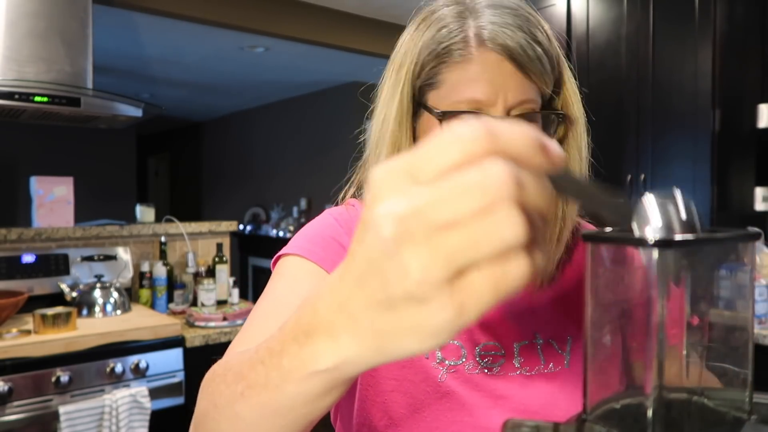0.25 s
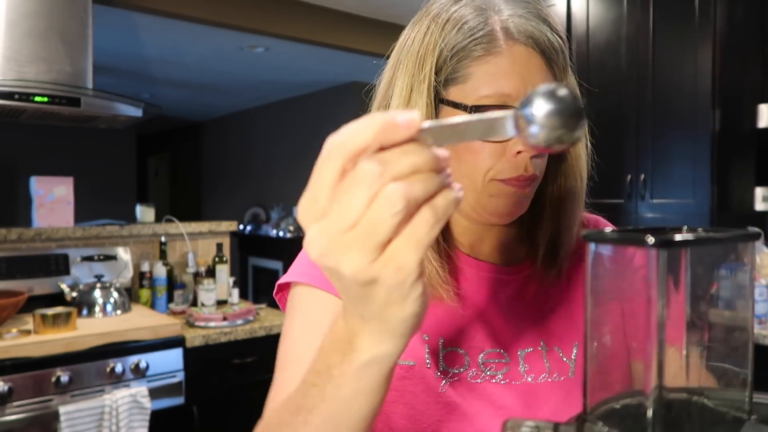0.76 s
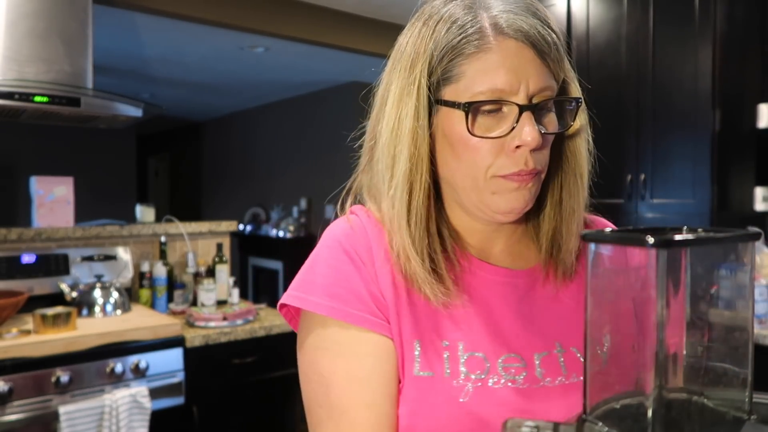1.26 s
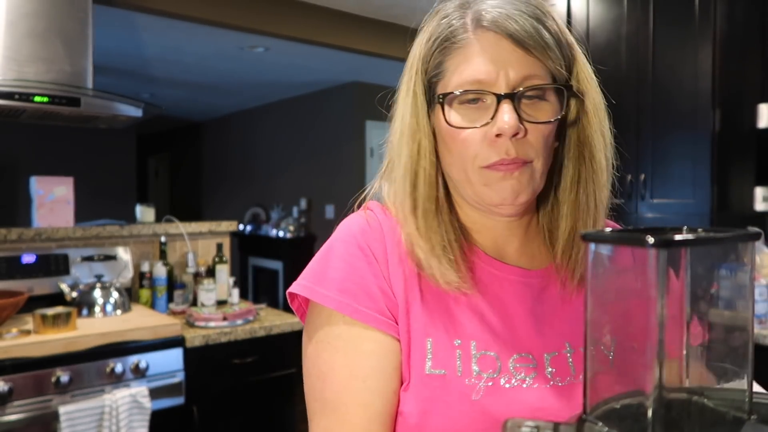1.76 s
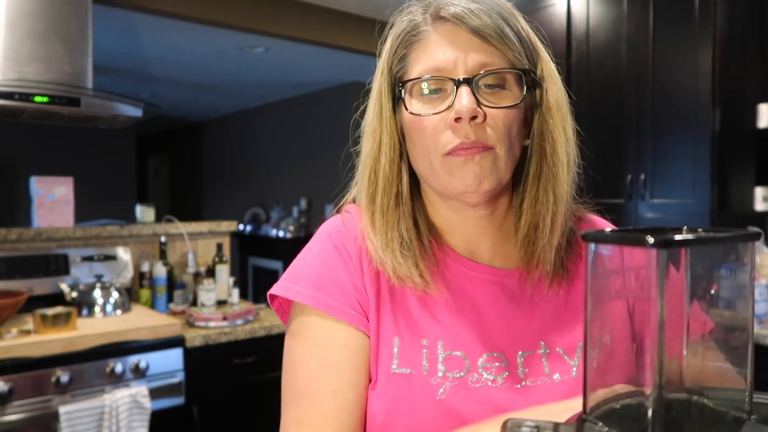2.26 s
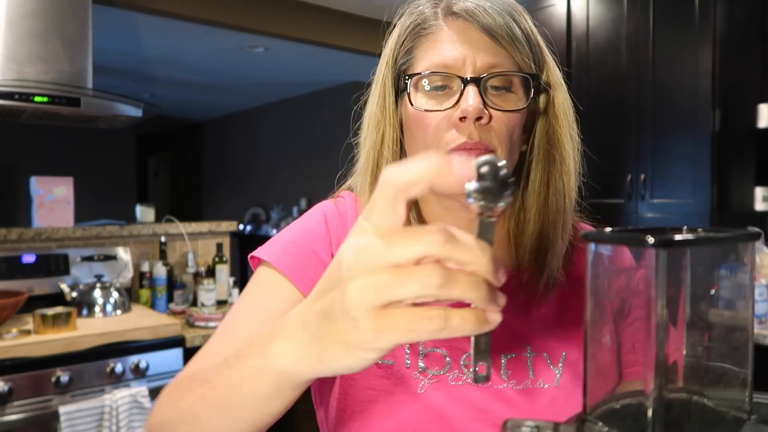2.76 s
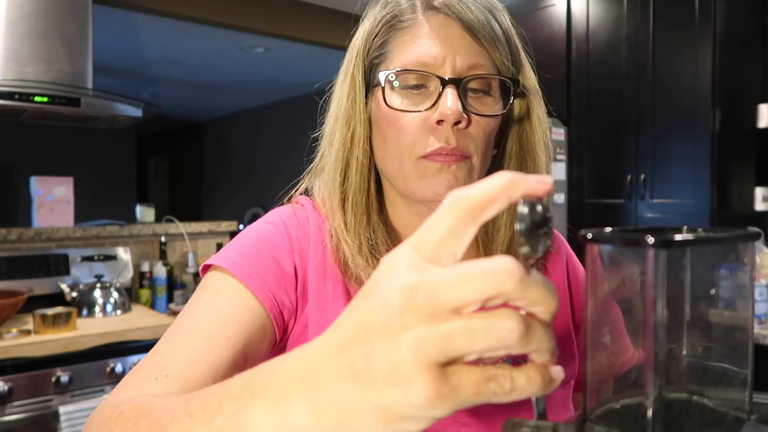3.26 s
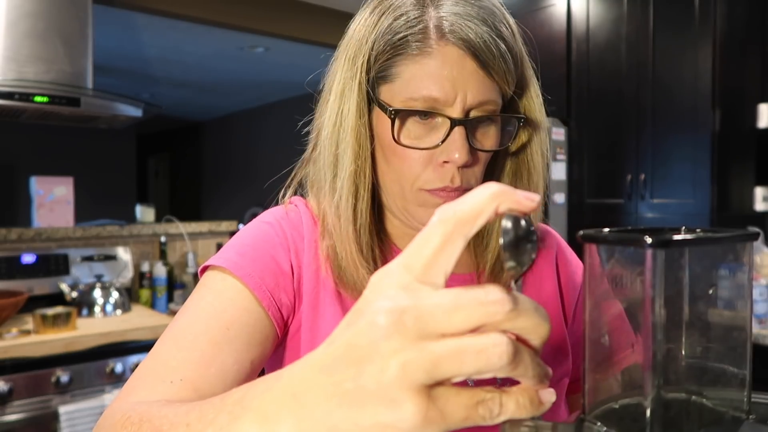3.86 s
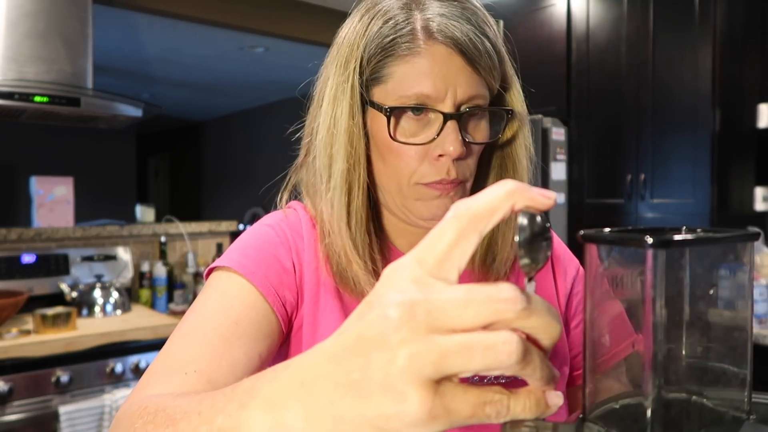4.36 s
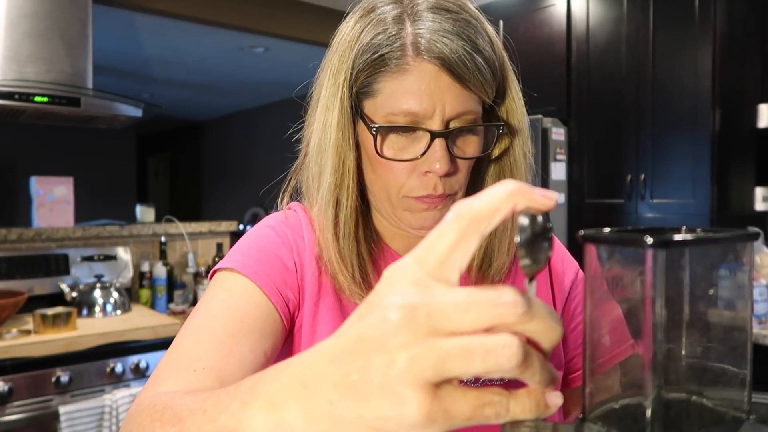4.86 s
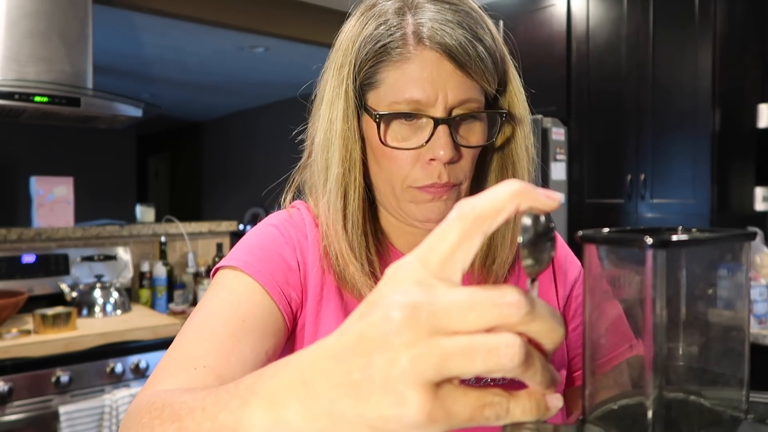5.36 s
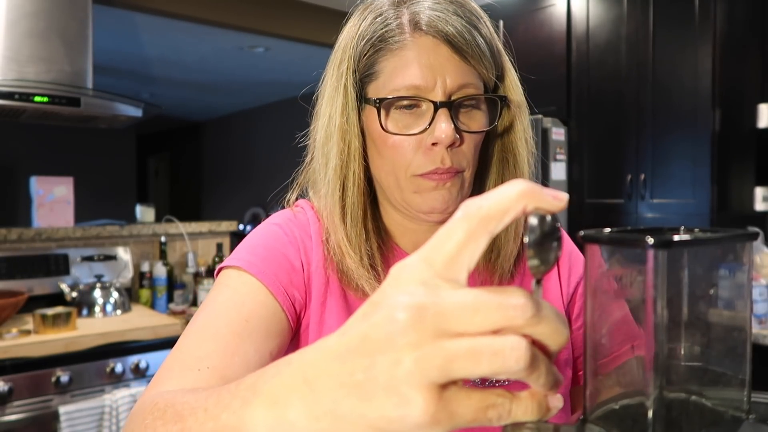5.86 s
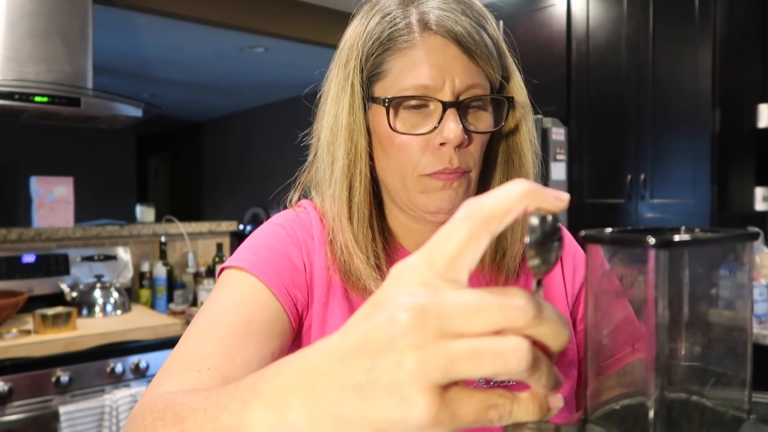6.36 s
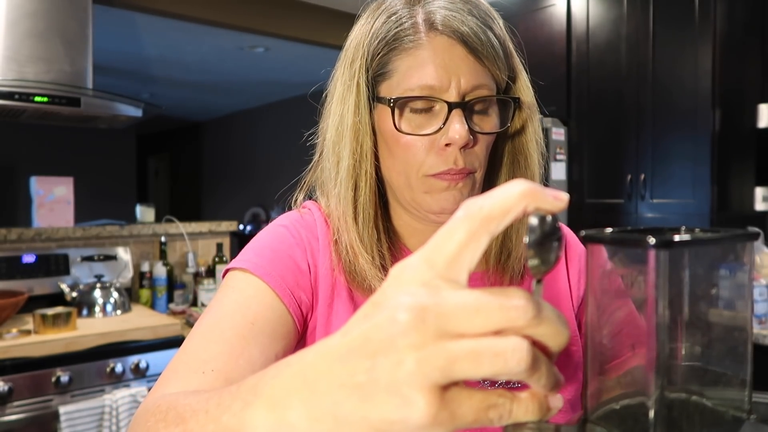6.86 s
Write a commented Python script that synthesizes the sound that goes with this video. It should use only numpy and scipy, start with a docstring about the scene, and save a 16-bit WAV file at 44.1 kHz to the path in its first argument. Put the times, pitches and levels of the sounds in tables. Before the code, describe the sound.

Four hard, ringing spoon taps on a plastic blender jar, very close to a stereo microphone in a lively kitchen. A steady low rumble rises, rustling strokes follow, then a set-down clunk with small rattles. The background suddenly thins. After a pause, several plastic switch clicks lead to a faint fluttering whistle and hiss; the motor catches with a rasp and whirs, easing and surging slightly.

```python
"""In a kitchen, a steel measuring spoon taps a plastic blender jar's rim four times: noise bursts and ringing modes.
Under it lies a steady rumble of shaped noise, heard at a level that dips, climbs, holds and then steps down;
strokes of rustling noise and a set-down clunk come before the step.
A switch clacks and the motor creeps with hissing noise and a thin, fluttering whistle.
It spins up to a whir of shaped noise and shaft tones, and hunts around its speed as power comes in bursts."""
import sys
import numpy as np
from scipy import signal
from scipy.fft import rfft, irfft
from scipy.io import wavfile
from scipy.ndimage import uniform_filter1d

SR = 44100
rng = np.random.default_rng(int(sys.argv[2]) if len(sys.argv) > 2 else 0)


def store_pcm(level_fs):
    """Save levels as 16-bit WAV."""
    pcm = np.round(np.clip(level_fs, -1, 1) * 32767).astype(np.int16)
    wavfile.write(sys.argv[1], SR, np.atleast_2d(pcm).T)


N = 313992
T = np.arange(N) / SR
FREQS = np.maximum(np.fft.rfftfreq(N, 1 / SR), 1)  # Hz, whole scene
HIT_HZ = np.maximum(np.fft.rfftfreq(SR, 1 / SR), 1)  # Hz, one-second hit

# The speed control feeds the motor in bursts; it coasts in between. Each row: power on [s], power off [s].
POWER = [(5.997, 6.51), (6.89, 7.2)]
CATCH_S = POWER[0][0]  # the motor catches
SWITCH_S = 5.445  # the motor is switched on


def spoon():
    """Each touch shakes the jar, its rebound clacks short and hard; returns near sound and spill to the room."""
    # Paired blows, touch then rebound. Each row: start [s], jar body [dB], bright clack [dB],
    # clack pitch [Hz], band that the spot favours [Hz], its lift [dB].
    taps = [(0.0387, -9, -24, 2900, 1260, 1.5), (0.0477, -21.5, -9, 2800, 520, 2.5),
            (0.2132, -9, -18.5, 2800, 1250, 3), (.2192, -13, -8, 2820, 1110, 1.5),
            (0.3902, -14, -22, 2830, 1340, 3), (0.3968, -11, -7.5, 2770, 1750, 3),
            (.5680, -13.5, -24, 2820, 573, 4), (0.5853, -15.5, -6, 2840, 600, 6)]
    # The jar's ringing modes. Each row: pitch [Hz], relative level [dB], t60 [s].
    jar_modes = [(372.4, 1, 0.28), (602, 2.5, .22), (853, -10, .3), (1030, 4.5, .38), (1180, -2, .45),
                 (1275, -1, .5), (1712, -8, 0.29), (1857, -10, 0.34), (2756, -15, 0.35), (3130, -16, .45),
                 (3451, -14, .27)]
    # The rebound's short ring. Each row: multiple of the clack pitch, relative level [dB], t60 [s].
    clack_modes = [(.77, -10, .008), (1, 0, .011), (1.27, -11, .010), (1.85, -18, .01)]
    # Broad resonances of jar and spoon. Each row: centre [Hz], width [Hz], relative lift [dB].
    jar_body = [(413, 32, 5.5), (519, 24, 4.5), (608, 62, 9), (900, 70, -3.5), (1022.6, 25, 13),
                (1276, 90, 7), (1830, 140, 5), (2200, 150, 5.5), (2420, 250, -5.5), (2730, 210, 8.5),
                (3228, 180, -5), (3570, 150, 8), (4610, 210, 3.5)]
    # Colour of the touch on the jar. Each row: frequency [Hz], relative level [dB per Hz].
    tap_colour = [(30, -41), (70, -24), (130, -5.5), (230, -10.5), (480, -4), (800, -14.5), (1200, -2.5),
                  (1550, -8.5), (2100, -5.5), (3000, -13.5), (4200, -17.5), (7000, -35.5), (11000, -42),
                  (15000, -53.5)]
    # Colour of the rebound's crack. Each row: frequency [Hz], relative level [dB per Hz].
    crack_colour = [(500, -20), (3000, 6), (4700, 6.5), (6000, -2.5), (7800, 1.5), (11000, -11.5),
                    (13200, -4.5), (15000, -10)]
    # Colour that spills into the room. Each row: frequency [Hz], relative level [dB per Hz].
    spill_colour = [(40, -29.5), (130, -4.5), (500, -2.5), (830, -7), (1150, -1), (1550, -6), (2700, -7.5),
                    (4000, -17), (5300, -16.5), (8000, -28.5), (11000, -38), (15000, -52)]
    near, spill = np.zeros(N), np.zeros(N)
    body_lift = lifts(jar_body, HIT_HZ)
    colour = at_hz(tap_colour, HIT_HZ) + body_lift
    # around the jar its resonances even out
    shell = body_response(.45 * body_lift)
    crack = body_response(at_hz(crack_colour, HIT_HZ))
    all_round = shell * body_response(at_hz(spill_colour, HIT_HZ))
    # the jar still rings from a tap just before
    linger = rms_one(irfft(all_round * rfft(rng.standard_normal(SR)), SR))
    add(near, 0, from_db(-39.5) * linger * dying(t60=.4))
    for s, body_db, clack_db, clack_hz, favoured_hz, favour_db in taps:
        body = body_response(colour + lifts([(favoured_hz, 400, favour_db)], HIT_HZ))
        jar = burst(body, t60=.04) + from_db(-31.5) * ring(jar_modes, spread_db=2.5)
        add(near, s, from_db(body_db) * jar)
        clack = ring([(clack_hz * ratio, db, t60) for ratio, db, t60 in clack_modes], spread_db=1.5)
        clack += from_db(-7.5) * burst(crack, t60=0.003, count=2)
        add(near, s, from_db(clack_db) * irfft(shell * rfft(clack), SR))
        # the clack stirs the room 7 dB less than its near level
        spill_gain = np.hypot(from_db(body_db), from_db(clack_db - 7))
        add(spill, s, spill_gain * burst(all_round, t60=0.026))
    return near, spill


def motor():
    """Air and bearing noise colour the housing's resonances; shaft and fan tones follow the speed."""
    # Resonances of housing and jar. Each row: centre [Hz], width [Hz], relative lift [dB].
    housing = [(594, 53, 7.5), (720, 66, 7), (930, 32, 12.5), (1137, 100, 7), (1403, 200, -7),
               (1610, 40, 14.5), (1780, 100, 6.5), (1957, 40, 8.5), (2170, 110, 10), (2315, 73, 14.5),
               (2495, 70, 7), (2914, 70, 12), (3270, 160, 8), (3750, 39.8, 8.5), (5320, 130, 9)]
    # Colour of the creeping hiss. Each row: frequency [Hz], relative level [dB per Hz].
    idle_colour = [(24, -55), (40, -43.5), (80, -19), (100, -11.5), (132, 2.5), (306, -10.5), (910, -6.5),
                   (1390, -6), (1610, -7.5), (3070, -11), (4030, -20), (4560, -17), (8480, -39.5),
                   (10900, -62), (15000, -74.5)]
    # Colour of the whir's air noise. Each row: frequency [Hz], relative level [dB per Hz].
    whir_colour = [(15, -80), (25, -56), (48, -35), (80, -32), (101, -15), (123, -8), (401, -8), (911, -5),
                   (1000, -7.5), (1130, 1), (1370, -6), (1590, -3), (3280, -5.5), (8000, -26.5),
                   (10400, -62), (17600, -120)]
    speed, torque = shaft_motion()
    turn = 2 * np.pi * np.cumsum(speed * (1 + .006 * wobble(110))) / SR  # shaft angle, slightly jittery
    housing_db = lifts(housing, FREQS)
    creep = noise(at_hz(idle_colour, FREQS) + .6 * housing_db)
    # a panel of the housing sings as long as the drive is on
    creep += from_db(-10) * narrow(1592, width_hz=40)
    # the blades chop the air once a turn, and the flow flutters
    air = noise(at_hz(whir_colour, FREQS) + 0.59 * housing_db)
    air = air * (1 + .1 * np.sin(turn)) * from_db(1.0 * wobble(60))
    hiss_colour = [(5000, -34), (8000, -2.5), (10000, -6.0), (15000, -15.5)]
    hiss = from_db(-29.0) * noise(at_hz(hiss_colour, FREQS))
    # the tone of 13 fan blades flutters, and weakens as it climbs out of the housing's range
    fan = from_db(-10.4) * np.sin(13 * turn) * (1 + .56 * narrow(0, 190))
    fan *= (np.maximum(speed, 240) / 300) ** -2.2
    shaft = from_db(-24.0) * np.sin(turn) + from_db(-21.5) * np.sin(2 * turn)
    # the whir is gritty, in uneven bursts
    grit_colour = [(500, -30), (1100, 1), (1500, -6), (2300, 0.5), (3300, -2), (5000, -24), (9000, -50)]
    grit = noise(at_hz(grit_colour, FREQS) + .6 * housing_db)
    grit = rms_one(grit * from_db(5 * wobble(45)))
    running = air + from_db(-10) * grit + hiss + fan + shaft
    # under torque the base shudders and the coupling rasps in a broad band that climbs with the speed
    shudder_colour = [(40, -46), (90, -24.0), (115, -1.5), (150, -4.5), (220, -9.0), (600, -7.0),
                      (1200, -33.5), (5000, -69.0)]
    shudder = noise(at_hz(shudder_colour, FREQS))
    rasp = np.sin(9.1 * turn) * narrow(0, 1400)
    strain = torque * (from_db(-41.5) * shudder + from_db(-38) * rasp)
    # the coupling chatters as it takes up the load
    chatter = narrow(2070, width_hz=810) * (1 + .5 * np.sin(turn))
    chatter = rms_one(chatter * from_db(3.1 * wobble(130)))
    surge = from_db(-23.5) * rise(CATCH_S, 0.062) ** 2 * (1 - rise(CATCH_S, 0.061)) * chatter
    creeping = from_db(-45) * rise(SWITCH_S, 0.013) * creep
    whir = from_db(-38.5) * rise(CATCH_S, 0.056) * running
    return creeping + whir + strain + surge + whistle()


def shaft_motion():
    """Speed (turns per s) and torque share: powered, the shaft closes on its top speed; otherwise it coasts."""
    kick, top = 160, 345  # turns per s: as it catches, and what it strives for
    spin_up_s, coast_s = .205, 2.2  # time constants
    speed, pull = np.full(N, float(kick)), np.zeros(N)
    for on, off in POWER:
        shortfall = (top - np.interp(on, T, speed)) * (1 - rise(on, spin_up_s))
        speed = np.where(T < on, speed, top - shortfall)
        speed = np.where(T < off, speed, np.interp(off, T, speed) * (1 - rise(off, coast_s)))
        pull += shortfall / (top - kick) * ((T >= on) & (T < off))
    eased = uniform_filter1d(speed, round(.06 * SR))  # the speed turns round gradually
    friction = 0.11  # share of full torque, felt even while coasting
    return eased, np.hypot(pull, friction) * rise(CATCH_S, 0.0036)


def whistle():
    """The drive's tone flutters and breaks up; it builds, holds, then falls back, a little higher once running."""
    creep_hz, running_hz, wander_hz = 4450, 4490, 16
    hz = creep_hz + (running_hz - creep_hz) * rise(CATCH_S, .08) + wander_hz * wobble(40)
    tone = rms_one(np.sin(2 * np.pi * np.cumsum(hz) / SR) * (1 + .42 * narrow(0, 70)))
    settled = ramp(6.18, length_s=0.055)
    level_db = -56.5 * (1 - settled) - 63 * settled
    return tone * from_db(level_db) * rise(SWITCH_S, 0.12)


def knocks():
    """Plastic and counter knocks, each with one ring that stands out; a softer contact has less treble."""
    # Duller knocks on jar, counter and switch. Each row: start [s], level [dB], treble edge [Hz], t60 [s],
    # main ring [Hz], ring level relative to the knock [dB], ring t60 [s].
    contacts = [(0.1703, -20, 2280, .07, 3260, 0, .08), (.1725, -22.5, 1400, 0.061, 780, 7.5, 0.043),
                (.179, -26, 1200, .06, 850, 5, .05), (.186, -23.5, 920, .14, 359, -2.5, 0.15),
                (3.238, -28, 7250, .08, 3170, 0, .035), (3.2397, -22, 4600, 0.04, 1650, 3, 0.009),
                (3.2427, -29.5, 440, 0.073, 136, 5.5, 0.12), (3.251, -38, 4500, 0.16, 700, -1, 0.14),
                (3.344, -38, 3000, 0.042, 2380, 5, 0.02), (3.3452, -39.5, 1500, .025, 794, 7, 0.018),
                (3.475, -41, 2750, 0.05, 2520, 0, .015), (3.477, -37.5, 1400, 0.034, 776, 12, .033),
                (5.347, -49, 2540, 0.039, 1130, 2, 0.04), (5.356, -48.5, 1100, 0.076, 484, 3.5, 0.074),
                (5.4048, -52.5, 3500, 0.065, 2870, -1, 0.055), (5.410, -56, 3500, 0.071, 1420, 6, .05),
                (5.4317, -48, 2720, 0.1, 1880, -1, 0.055), (5.4447, -31, 4200, 0.061, 319, -1, 0.066),
                (5.4476, -33.5, 4200, 0.037, 593, 3.5, 0.055),
                (5.454, -29.5, 4760, 0.031, 985, -0.5, 0.033), (5.4622, -31.5, 4770, .045, 387, -3, 0.051),
                (5.480, -36, 3020, 0.019, 667, 10.5, 0.019), (5.498, -39, 3000, 0.022, 1130, 12, 0.027),
                (5.9975, -35, 4500, 0.036, 600, -4.5, 0.043)]
    # Colour of a knock. Each row: frequency [Hz], relative level [dB per Hz].
    knock_colour = [(40, -26), (130, 2), (260, -0.5), (700, -4), (1150, -7), (1700, -5), (2800, -6),
                    (6000, -17.5), (11000, -19), (15000, -43)]
    out, colour = np.zeros(N), at_hz(knock_colour, HIT_HZ)
    for s, db, edge_hz, t60, ring_hz, ring_db, ring_t60 in contacts:
        body = body_response(colour - 10 * np.log10(1 + (HIT_HZ / edge_hz) ** 6))
        knock = burst(body, t60) + ring([(ring_hz, ring_db, ring_t60)], spread_db=1.0)
        add(out, s, from_db(db) * knock)
    return out


def background():
    """Steady ventilation rumble and hum, heard at a changing level; a light rustle lies over it."""
    # Colour of the rumble. Each row: frequency [Hz], relative level [dB per Hz].
    room_colour = [(15, -43.5), (25, -24.5), (49, 0), (81, -9), (118, -3.5), (202, -10), (383, -5),
                   (490, -16), (637, -20.5), (729, -17), (1280, -25), (1540, -23.5), (4150, -31.5),
                   (12400, -46), (13500, -49), (15000, -64)]
    # Lasting, wavering tones in the room. Each row: pitch [Hz], level relative to the rumble [dB].
    room_lines = [(49, -14), (121, -10), (1583, -30.5), (13006, -42)]
    # Colour of soft handling. Each row: frequency [Hz], relative level [dB per Hz].
    rustle_colour = [(300, -13), (900, 0), (2400, -0.5), (5000, -9.5), (9000, -19), (15000, -33.5)]
    colour = at_hz(room_colour, FREQS)
    rumble = diffuse(noise(colour), noise(colour))
    hum = sum(from_db(db) * narrow(hz, 10.0) for hz, db in room_lines)
    colour = at_hz(rustle_colour, FREQS)
    rustle = diffuse(noise(colour), noise(colour), closeness=2.0)
    rustle = rustle * from_db(2.2 * wobble(100) + 1.2 * wobble(18))  # uneven strokes
    return background_gain() * (rumble + hum) + rustle_level() * rustle


def background_gain():
    """Set gain on the steady rumble and hum: low during the taps, climbing, held, then stepped down."""
    climb_s, climb_db_per_s, full_db = 0.58, 8.5, -42.5
    dip_db = np.interp(T, [0, climb_s], [-45, -58.5])
    before_db = np.minimum(dip_db + climb_db_per_s * np.maximum(T - climb_s, 0), full_db)
    stepped = ramp(4.094, length_s=0.011)
    # the quieter level after the step falls 4 dB per s from the moment the motor is switched on
    after_db = -63.5 - 4 * np.maximum(T - SWITCH_S, 0)
    return from_db(before_db * (1 - stepped) + after_db * stepped)


def rustle_level():
    """Gain of the rustle: each stroke grows and dies exponentially, and their powers sum."""
    # Strokes of soft handling rustle. Each row: peak time [s], level [dB], rise [s], fall [s].
    handling = [(.98, -59.5, 0.035, 0.15), (1.339, -54.5, 0.028, 0.17), (1.71, -52, 0.21, 0.087),
                (2.27, -53.5, 0.35, 0.057), (2.378, -43, 0.025, 0.03), (2.61, -48, 0.095, 0.054),
                (2.698, -42, 0.041, 0.1)]
    strokes = []
    for s, db, rise_s, fall_s in handling:
        distance = np.maximum((s - T) / rise_s, (T - s) / fall_s)
        strokes.append(from_db(db) * np.exp(-distance))
    return np.linalg.norm(strokes, axis=0)


def kitchen(x):
    """Dense reflections that die at their own rate in each octave."""
    # The kitchen's tail. Each row: frequency [Hz], t60 [s].
    decay_times = [(100, 0.39), (400, 0.36), (1200, 0.51), (3000, 0.42), (6000, 0.46), (14000, 0.31)]
    tails, edges = np.zeros((2, SR)), np.geomspace(60, 16000, 9)
    for low, high in zip(edges, edges[1:]):
        octave = signal.butter(2, [low, high], "band", fs=SR, output="sos")
        band = signal.sosfilt(octave, rng.standard_normal((2, SR)))
        # the reflections build up before they die
        tails += band * dying(at_hz(decay_times, np.sqrt(low * high))) * (1 - dying(0.021))
    response = rms_one(diffuse(*tails, closeness=1.8)) / np.sqrt(SR)
    return signal.fftconvolve(x[None], response, axes=1)[:, :N]


def microphones(x):
    """Two close capsules; the counter and the housing scatter the treble differently to each."""
    # The direct sound at the pair. Each row: frequency [Hz], left lag [radians], left-right level [dB],
    # scattered share [dB].
    capsules = [(200, 0, -.1, -40), (1200, .06, -.6, -25), (2400, .35, -1.8, -19), (4000, .9, -2.4, -10),
                (7000, 1.6, -1.3, -5), (11000, 3.0, -.3, -9), (15000, 3.15, 0, -12)]
    lag, pan_db, scatter_db = (at_hz([(row[0], row[k]) for row in capsules], FREQS) for k in range(1, 4))
    echoes = rfft(rng.standard_normal((2, SR)) * dying(0.12), N)
    paths = 1 + from_db(scatter_db) * echoes / np.sqrt(np.mean(abs(echoes) ** 2))
    sides = np.array([np.exp(-1j * lag) * from_db(pan_db / 2), from_db(-pan_db / 2)])
    return irfft(rfft(x) * paths * sides, N)


def diffuse(a, b, closeness=1):
    """Sound from all round: alike at both capsules in the bass, unrelated or opposed in the treble."""
    # Likeness of left and right. Each row: frequency before closeness scales it [Hz], correlation.
    likeness = [(50, 1), (130, 1), (300, 0.93), (600, 0.8), (1200, 0.87), (2400, 0.23), (4000, -0.048),
                (7000, -0.26), (12000, -0.78)]
    hz = (np.fft.rfftfreq(len(a), 1 / SR) + 1) / closeness
    alike = np.clip(at_hz(likeness, hz), -.99, .999)
    mid = irfft(rfft(a) * np.sqrt((1 + alike) / 2), len(a))
    side = irfft(rfft(b) * np.sqrt((1 - alike) / 2), len(a))
    return np.array([mid + side, mid - side])


def ring(modes, spread_db):
    """One blow: each mode sounds with a strength of its own, signs alternating."""
    out = np.zeros(SR)
    for k, (hz, db, t60) in enumerate(modes):
        strength = (-1) ** k * from_db(db + spread_db * rng.normal())
        out += strength * np.sin(2 * np.pi * hz * T[:SR]) * dying(t60)
    return out


def burst(body, t60, count=5):
    """One contact, spread by reflections inside the body (all-passes), with the energy of a unit decay."""
    delays = rng.uniform(.3, 1.7, (count, 1))
    delays *= abs(t60) / np.log(10 ** 6) / delays.sum()
    trip = np.exp(-2j * np.pi * np.arange(len(body)) * delays)
    spread = np.prod((trip - .65) / (1 - .65 * trip), axis=0)
    return rms_one(irfft(body * spread, SR)) * np.sqrt(np.mean(dying(t60) ** 2))


def body_response(shape_db):
    """Spectrum of the causal (minimum-phase) body with this colour."""
    cepstrum = irfft(np.log(from_db(shape_db)), SR)
    cepstrum[0] /= 2
    return np.exp(rfft(2 * cepstrum[:SR // 2], SR))


def lifts(resonances, freqs):
    """The bumps that resonances put on a spectrum, in dB."""
    return sum(db / (1 + (2 * (freqs - hz) / width) ** 2) for hz, width, db in resonances)


def noise(shape_db):
    """Unit noise with the given relative level at each frequency."""
    phases = np.exp(2j * np.pi * rng.random(len(FREQS)))
    return rms_one(irfft(phases * from_db(shape_db), N))


def narrow(hz, width_hz):
    """Noise held in one steep resonance: a wavering tone, or a slow flutter at 0 Hz."""
    return noise(-20 * np.log10(1 + (2 * (FREQS - hz) / width_hz) ** 2))


def wobble(rate_hz):
    """Smooth chance of unit spread."""
    knots = rng.standard_normal(N // 10)
    return rms_one(np.interp(2 * abs(rate_hz) * T, np.arange(len(knots)), knots))


def dying(t60):
    """One second of exponential decay."""
    return from_db(-60 * T[:SR] / max(t60, 1e-3))


def rise(start_s, lag_s):
    """Nothing before the start, then an exponential approach to one."""
    return 1 - np.exp(-np.maximum(T - start_s, 0) / max(lag_s, 1e-3))


def ramp(start_s, length_s):
    """A straight crossing from zero to one."""
    return np.clip((T - start_s) / length_s, 0, 1)


def at_hz(points, hz):
    """Read a spectrum on a log-frequency axis."""
    return np.interp(np.log(hz), np.log(np.array(points)[:, 0]), np.array(points)[:, 1])


def from_db(db):
    """Decibels to gain."""
    return 10 ** (np.asarray(db) / 20)


def rms_one(x):
    """Scale to unit power."""
    return x / np.sqrt(np.mean(x ** 2) + 1e-20)


def add(out, s, sound):
    """Mix a sound in at a time in seconds."""
    i = max(round(s * SR), 0)
    out[i:i + len(sound)] += sound[:N - i]


def scene():
    """Jar and motor stand close by, a little to the right; knocks on the counter carry more of the room."""
    taps, spill = spoon()
    thuds = knocks()
    drive = motor()
    reflected = kitchen(from_db(-12) * spill + from_db(-9.0) * thuds + from_db(-13.5) * drive)
    return microphones(taps + thuds + drive) + reflected + background()


def record(dry):
    """A steep low-pass cuts the top above 15.3 kHz."""
    return signal.sosfilt(signal.ellip(10, .1, 80, 15300, fs=SR, output="sos"), dry)


dry = scene()
out = record(dry)
store_pcm(out)
```